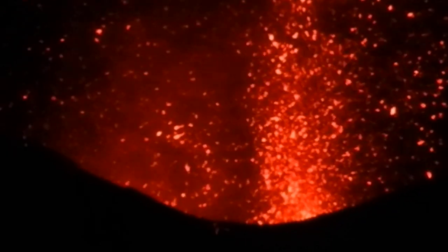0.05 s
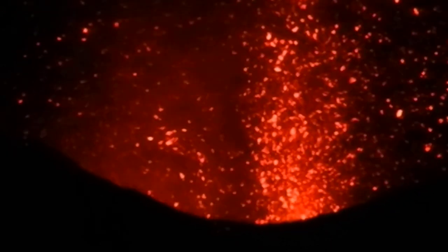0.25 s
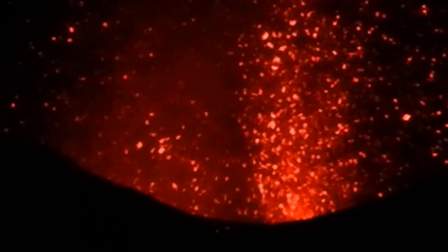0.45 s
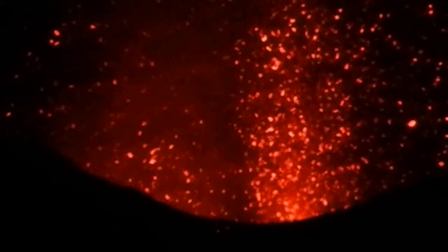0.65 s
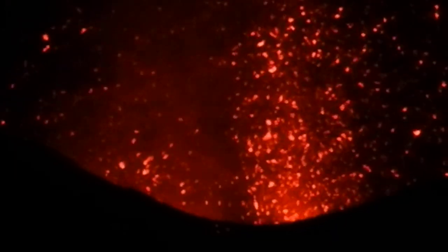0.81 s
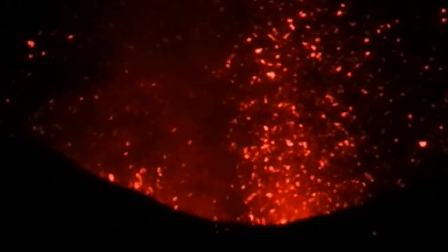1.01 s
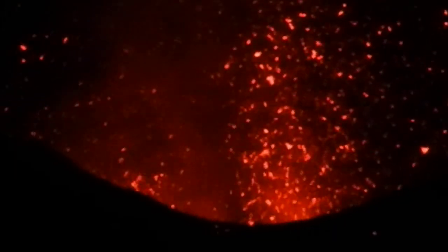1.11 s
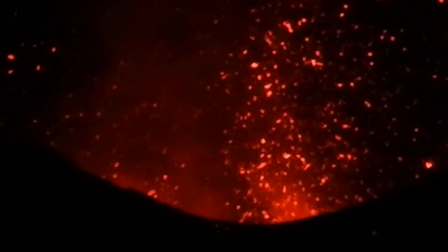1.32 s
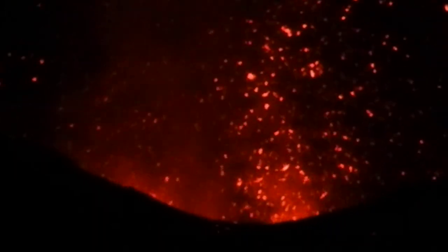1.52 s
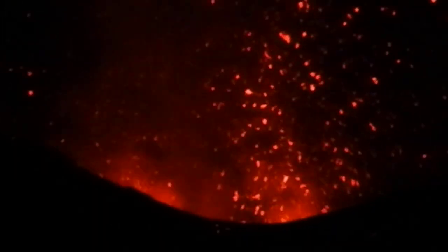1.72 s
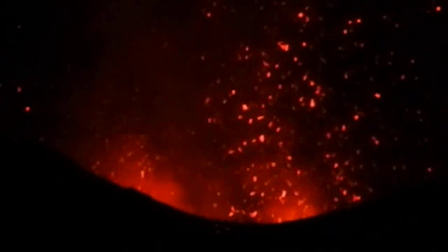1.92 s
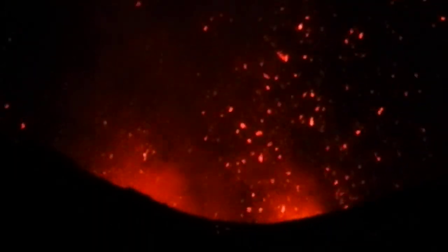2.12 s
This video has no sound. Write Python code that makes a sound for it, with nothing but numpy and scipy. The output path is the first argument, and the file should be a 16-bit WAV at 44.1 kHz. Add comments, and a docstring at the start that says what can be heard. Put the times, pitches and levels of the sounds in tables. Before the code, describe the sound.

Low wind rumble and soft, irregular thumps hit the microphone on a volcano's slope. The strongest gust comes first, then a brief lull and a second gust, over thin hiss and the faint, even roar of a far lava fountain.

```python
"""On the slope of an erupting volcano, at night. Gusts buffet the two microphone ports:
big eddies strike as low, soft thumps, small ones merge into rumble. Under them lie the faint,
steady roar of the distant lava fountain and the hiss of the microphone.
A few faint hollow tones come and go."""
import sys
import numpy as np
from scipy import signal
from scipy.io import wavfile
from scipy.ndimage import uniform_filter1d

SR = 44100
rng = np.random.default_rng(int(sys.argv[2]) if len(sys.argv) > 2 else 0)


def inscribe(sig):
    """Save sig as 16-bit PCM at rate SR to the path in sys.argv[1].

    A 1-D sig is mono; a 2-D sig holds one channel per row.
    Samples are clipped to [-1, 1] before scaling.
    """
    pcm = np.round(np.clip(np.atleast_2d(sig).T, -1, 1) * 32767)
    wavfile.write(sys.argv[1], SR, pcm.astype(np.int16))


N = 94815

# Wind between the big eddies. Each row: time in seconds, relative level in dB, left minus right in dB.
GUST_CURVE = [(0, -45, -4), (.05, -57, -7), (.27, -46, -7), (.32, -29.5, 2), (.44, -31.5, -7),
              (.57, -34, -6.5), (.70, -49.5, -7), (.77, -45.5, -14), (.81, -49, -8), (.89, -47.5, -11),
              (.97, -34, -3.5), (1.05, -46.5, -7.5), (1.2, -36.5, -3.5), (1.32, -39, -3.5),
              (1.42, -47.5, -0.5), (1.47, -44.5, -2.5), (1.66, -43.5, 5), (1.78, -51, -4),
              (1.86, -45, -8.5), (2.0, -52.5, -1), (2.15, -45.5, -3)]
# Noise spectra. Each row: frequency in Hz, relative spectral density in dB.
RUMBLE_SPECTRUM = [(20, -27), (35, -14.5), (55, -10.5), (80, 5), (115, -10), (160, -26.5), (250, -30.5),
                   (400, -42), (800, -58.5)]
FOUNTAIN_SPECTRUM = [(40, -4), (150, 1), (300, -5.5), (500, -7.5), (800, -10), (1400, -14.5), (2200, -21),
                     (4000, -49.5)]
HISS_SPECTRUM = [(500, -2.5), (2000, -3.5), (3000, 0.5), (5500, 1), (8000, -3.5), (11000, -3),
                 (15000, -3.5), (17000, -6)]
# Stereo images. Each row: frequency in Hz, left-right correlation from -1 to 1.
RUMBLE_CORRELATION = [(40, -0.65), (120, -0.74), (400, -0.37)]
FOUNTAIN_CORRELATION = [(200, -0.34), (700, -0.45), (2000, -0.44)]
HISS_CORRELATION = [(1000, -0.17), (5000, -0.31), (10000, -0.34), (14000, -0.018)]
# Big eddies. Each row: centre in seconds, peak in dB, Gaussian sigma in ms, left minus right in dB.
EDDY_STRIKES = [(.004, -38.5, 2.47, -18), (0.143, -29.5, 3.76, -9), (.231, -27, 3.8, -20),
                (0.305, -17, 1.47, -16.5), (0.327, -14.5, 2.3, -5), (.366, -6.5, 1.53, 4.5),
                (.375, -24, 0.58, 10), (.390, -16.5, 2, 4.5), (0.411, -30, 1.8, -2.5),
                (.427, -17, 1.96, -12.5), (.441, -20.5, 1.2, -16), (0.451, -17.5, 1.7, 4.5),
                (.467, -27, 2.4, 7), (0.48, -16.5, 1.96, -11), (0.497, -18.5, 2.9, -6.5),
                (.506, -20.5, 0.46, -4.5), (.5075, -12.5, 0.85, -12.5), (.536, -18.5, 2.2, -8.5),
                (0.549, -14.5, 2.84, -12.5), (0.573, -23, 4, -5.5), (.618, -22.5, 2.75, -5.5),
                (0.645, -23.5, 2.27, -7), (0.744, -41, 3.4, -12), (0.772, -42, 4, -10),
                (.843, -12.5, 2.21, -9), (0.928, -31, 2.1, 8), (.968, -18.5, 2.6, -7),
                (0.982, -17.5, 1.58, 8.5), (1.002, -27, 1.44, -8), (1.126, -18, 2.2, -8.5),
                (1.176, -19, 1.75, -7.5), (1.190, -20.5, 1.42, 14), (1.197, -21.5, 2.33, -15),
                (1.213, -13.5, 2.24, -10), (1.235, -14, 2.58, -11.5), (1.359, -22.5, 2.76, -9.5),
                (1.484, -29, 4.1, 6.5), (1.538, -26, 3.1, 8), (1.621, -33, 4.4, 11),
                (1.684, -32.5, 2.8, 2.5), (1.817, -33.5, 3.5, -9), (1.845, -24, 2.93, -10),
                (1.859, -28, 2.12, -13), (1.883, -33.5, 3.9, -2.5), (1.997, -38, 3.6, -14)]
# Hollow tones. Each row: centre in seconds, half-height width in seconds, pitch in Hz, level in dB.
HOLLOW_TONES = [(.095, 0.038, 700, -59.5), (0.197, 0.052, 710, -59), (0.348, 0.12, 700, -62.5),
                (0.452, 0.068, 735, -59), (0.55, 0.065, 685, -58), (1.078, 0.056, 320.2, -56.5)]


def from_db(db):
    """Decibels to gain."""
    return 10 ** (np.asarray(db) / 20)


def drift(rate_hz):
    """Random wander at rms 1: noise through a two-pole low-pass at rate_hz."""
    hop, settle = 40, 2000
    pole = np.exp(-2 * np.pi * hop * rate_hz / SR)
    noise = rng.standard_normal(N // hop + settle + 2)
    slow = signal.lfilter([1], [1, -2 * pole, pole ** 2], noise)[settle:]
    slow /= np.sqrt(np.mean(slow ** 2))
    return np.interp(np.arange(N) / hop, np.arange(len(slow)), slow)


def noise_bands(spectrum, correlation):
    """Half-octave stereo noise, summing to rms 1. Returns centres in Hz and bands x 2 x N."""
    edges_hz = 20 * 2 ** np.arange(0, 10.1, .5)
    centres_hz = np.sqrt(edges_hz[1:] * edges_hz[:-1])
    hz, db = np.transpose(spectrum)
    used = (centres_hz > hz[0] / 2) & (centres_hz < hz[-1] * 2)
    bands = []
    for low_hz, high_hz, centre_hz in zip(edges_hz[:-1][used], edges_hz[1:][used], centres_hz[used]):
        band_pass = signal.butter(3, [low_hz, high_hz], "band", fs=SR, output="sos")
        mid, side = signal.sosfilt(band_pass, rng.standard_normal((2, N + SR // 4)))[:, -N:]
        gain = from_db(np.interp(np.log(centre_hz), np.log(hz), db))
        alike = np.interp(centre_hz, *np.transpose(correlation))
        bands.append(gain * (np.sqrt(1 + alike) * mid + np.sqrt(1 - alike) * side * [[1], [-1]]))
    return centres_hz[used], np.array(bands) / np.std(sum(bands))


def wind_rumble(trim_db=0.5, average_s=0.034, tilt_per_octave=0.13):
    """Small eddies merge into a lumpy rumble, louder and brighter as the gust grows."""
    times_s, *columns = np.transpose(GUST_CURVE)
    level_db, pan_db = [np.interp(np.arange(N) / SR, times_s, column) for column in columns]
    centres_hz, bands = noise_bands(RUMBLE_SPECTRUM, RUMBLE_CORRELATION)
    octaves_above_80_hz = np.maximum(np.log2(centres_hz / 80), 0)[:, None]
    tilt_db = tilt_per_octave * octaves_above_80_hz * (level_db - level_db.mean())
    rumble = (bands * from_db(tilt_db)[:, None]).sum(axis=0)
    # Level the short-term power so the gust sets the loudness.
    power = uniform_filter1d(np.mean(rumble ** 2, axis=0), int(average_s * SR))
    power = uniform_filter1d(power, int(average_s * SR / 2))
    rumble /= np.sqrt(power + 1e-12)
    return rumble * from_db(trim_db + level_db + np.array([pan_db, -pan_db]) / 2)


def lava_fountain(level_db=-54, wander_db=0.7, wander_hz=4.4):
    """Distant eruption: a dull, nearly even roar, each band wandering slightly."""
    _, bands = noise_bands(FOUNTAIN_SPECTRUM, FOUNTAIN_CORRELATION)
    return sum(band * from_db(level_db + wander_db * drift(wander_hz)) for band in bands)


def microphone_hiss(level_db=-61):
    """Steady self-noise of the microphone."""
    _, bands = noise_bands(HISS_SPECTRUM, HISS_CORRELATION)
    return from_db(level_db) * bands.sum(axis=0)


def eddy_thumps(port_low_cut_hz=109.5):
    """Each eddy is a smooth pressure bump at one port; the other channel gets it weaker and inverted."""
    out, t_s = np.zeros((2, N)), np.arange(N) / SR
    low_cut = signal.butter(3, port_low_cut_hz, "high", fs=SR, output="sos")
    for centre_s, peak_db, sigma_ms, pan_db in EDDY_STRIKES:
        sigmas = (t_s - centre_s) * 1000 / sigma_ms
        pressure = np.exp(-.5 * np.minimum(sigmas ** 2, 80))
        thump = signal.sosfilt(low_cut, pressure)
        port_gains = from_db([[min(pan_db, 0)], [min(-pan_db, 0)]]) * [[1], [-1]]
        out += from_db(peak_db) * port_gains * thump / np.abs(thump).max()
    return out


def hollow_tones(bandwidth_share=0.067):
    """Brief swells of narrow-band noise from straight ahead, equal in both channels."""
    out, t_s = np.zeros(N), np.arange(N) / SR
    for centre_s, width_s, pitch_hz, level_db in HOLLOW_TONES:
        swell = np.cos(np.pi / 2 * np.clip((t_s - centre_s) / width_s, -1, 1)) ** 2
        bandwidth_hz = bandwidth_share * pitch_hz
        waver = drift(bandwidth_hz) + 1j * drift(bandwidth_hz)
        tone = np.real(waver * np.exp(2j * np.pi * pitch_hz * t_s))
        tone_rms = np.sqrt(np.average(tone ** 2, weights=swell ** 2))
        out += from_db(level_db) * swell * tone / tone_rms
    return out


def scene():
    """Wind on the ports over the far eruption, faint tones and hiss."""
    return eddy_thumps() + wind_rumble() + lava_fountain() + hollow_tones() + microphone_hiss()


def record(dry):
    """Steep elliptic low-pass."""
    cutoff_hz = 15800
    return signal.sosfilt(signal.ellip(12, .1, 90, cutoff_hz, fs=SR, output="sos"), dry)


dry = scene()
out = record(dry)
inscribe(out)
```